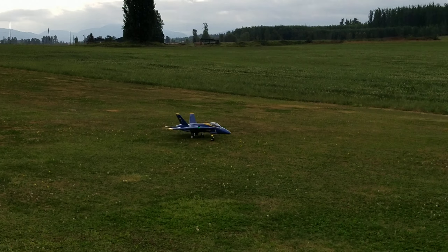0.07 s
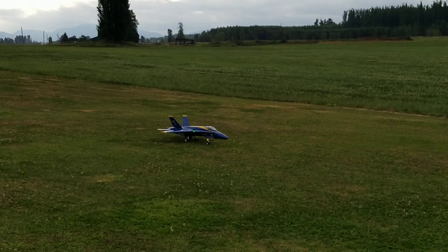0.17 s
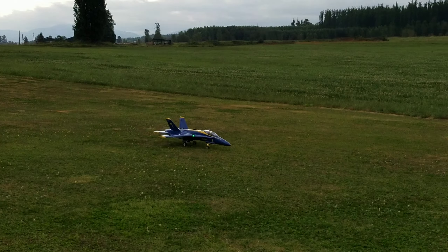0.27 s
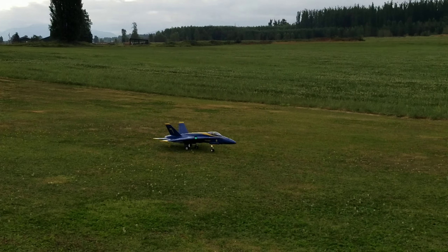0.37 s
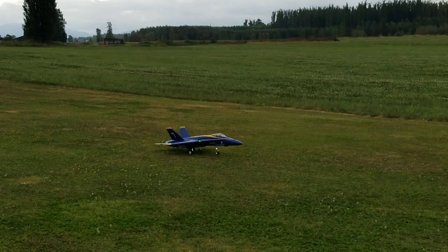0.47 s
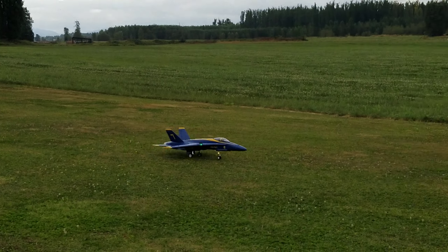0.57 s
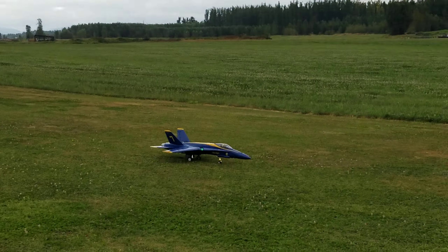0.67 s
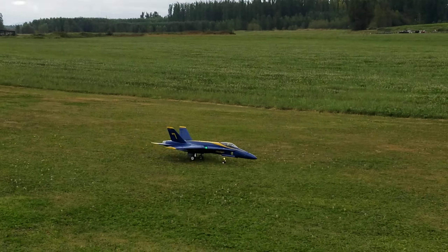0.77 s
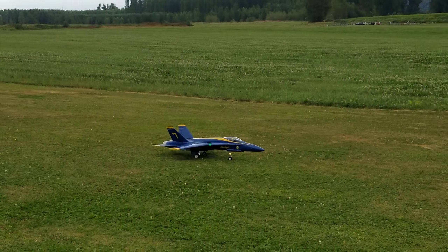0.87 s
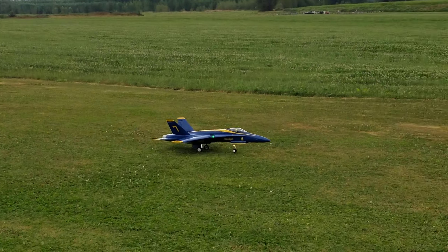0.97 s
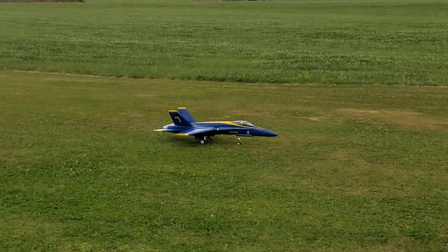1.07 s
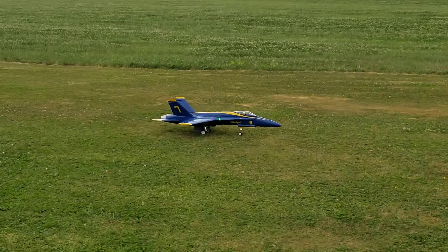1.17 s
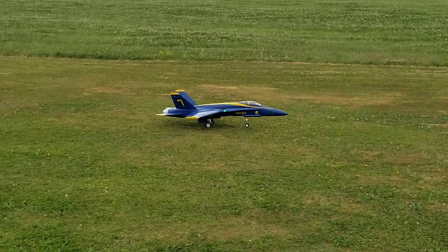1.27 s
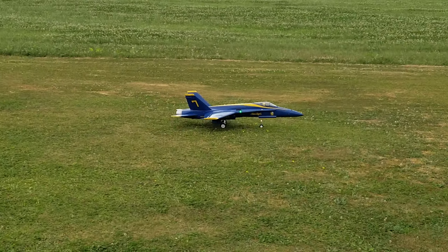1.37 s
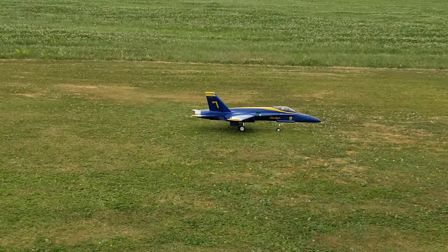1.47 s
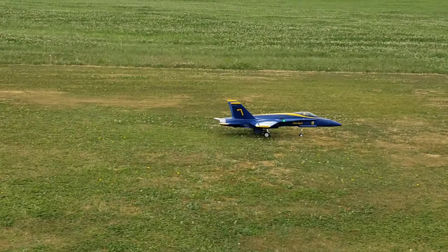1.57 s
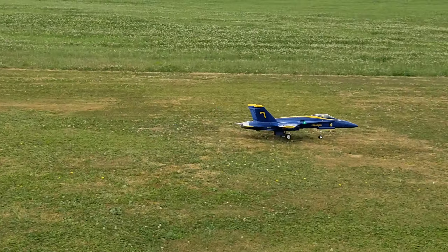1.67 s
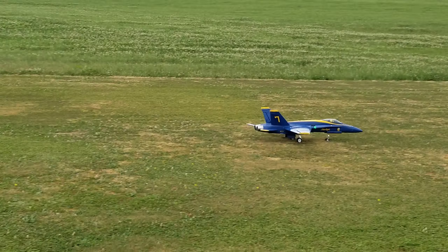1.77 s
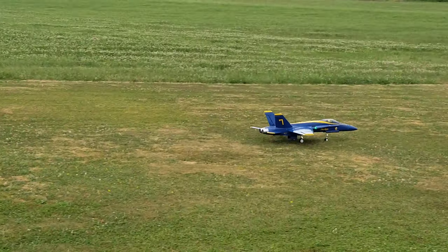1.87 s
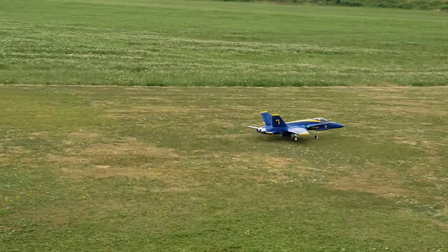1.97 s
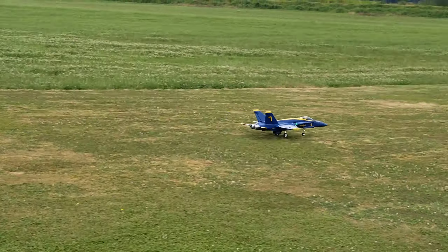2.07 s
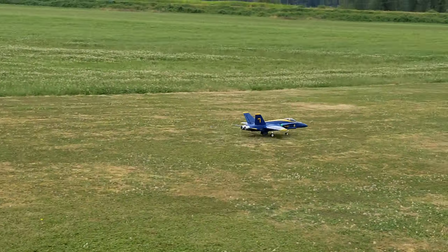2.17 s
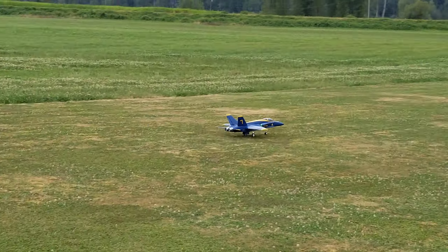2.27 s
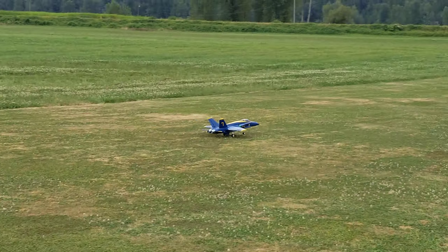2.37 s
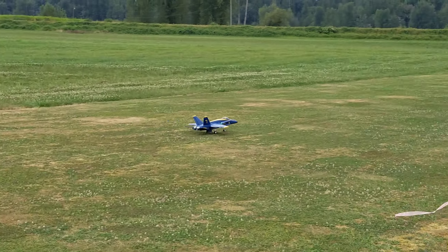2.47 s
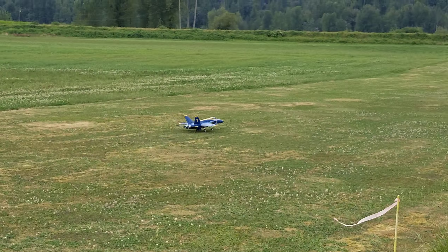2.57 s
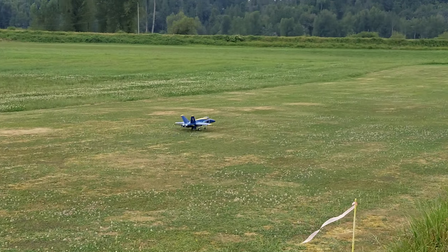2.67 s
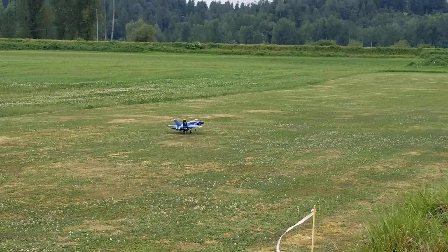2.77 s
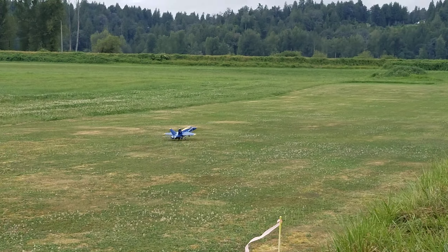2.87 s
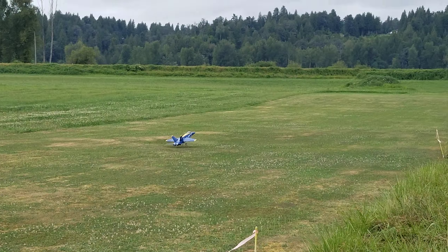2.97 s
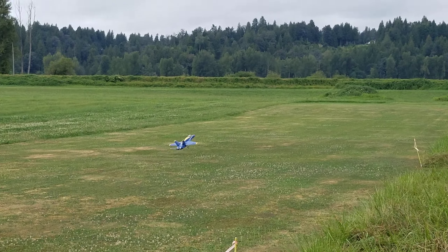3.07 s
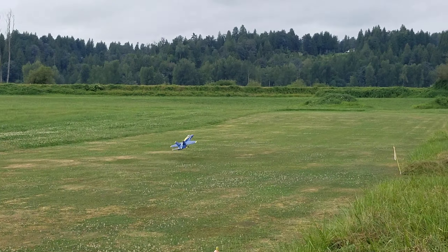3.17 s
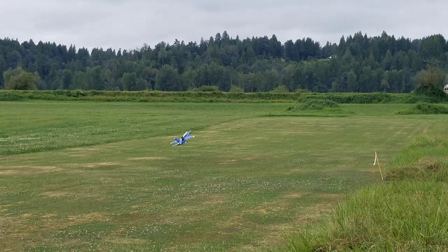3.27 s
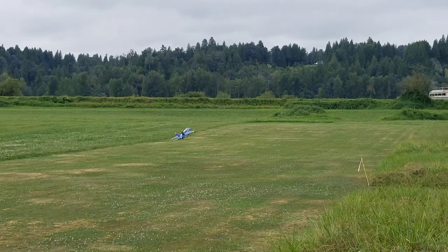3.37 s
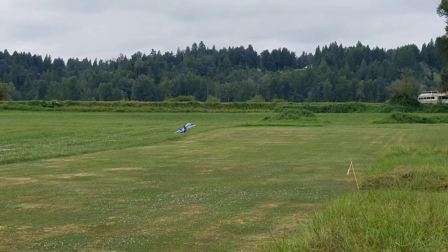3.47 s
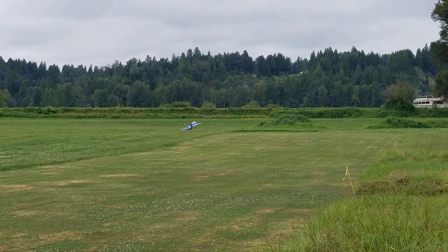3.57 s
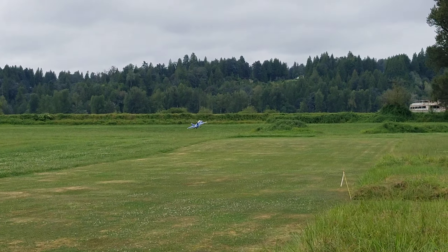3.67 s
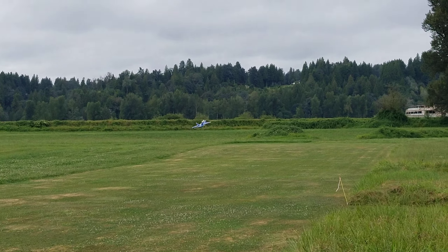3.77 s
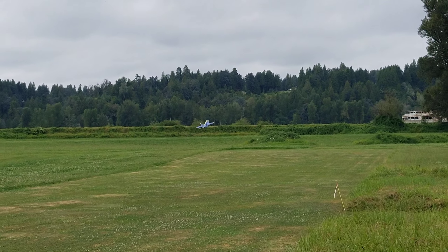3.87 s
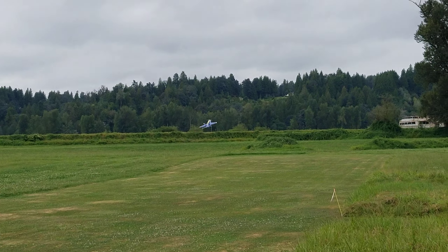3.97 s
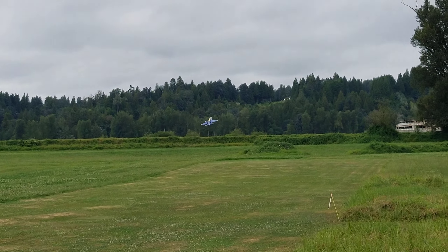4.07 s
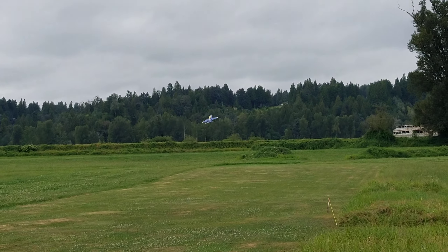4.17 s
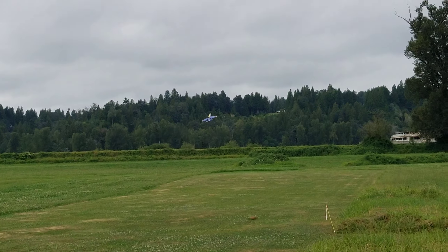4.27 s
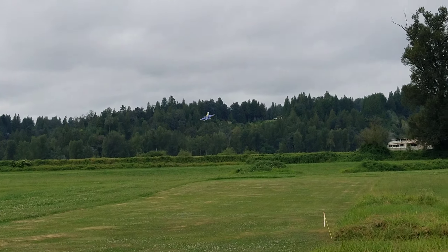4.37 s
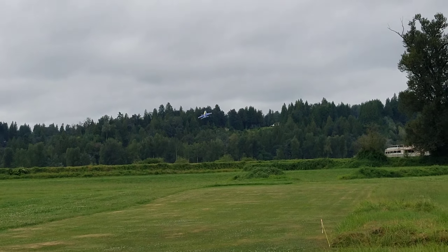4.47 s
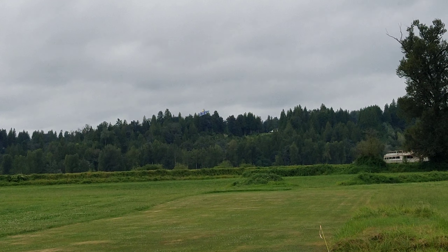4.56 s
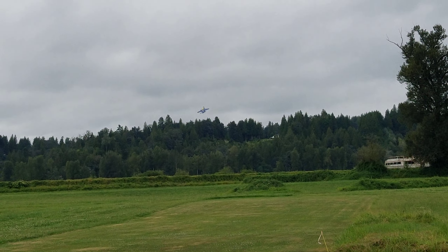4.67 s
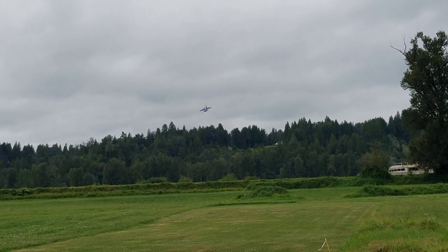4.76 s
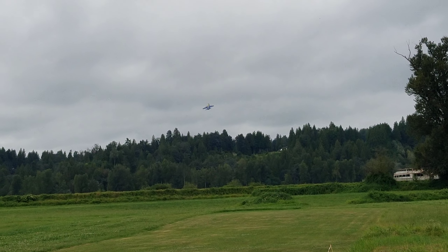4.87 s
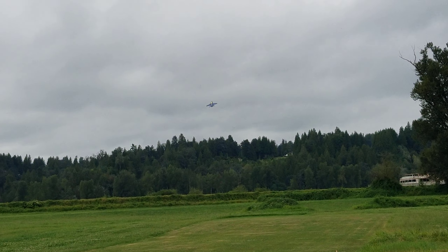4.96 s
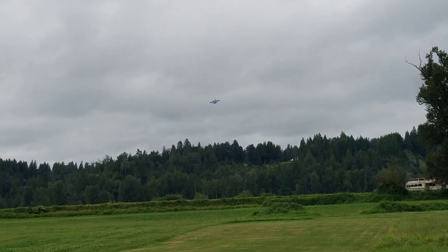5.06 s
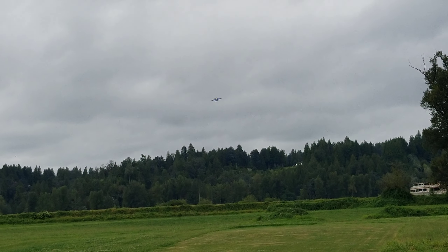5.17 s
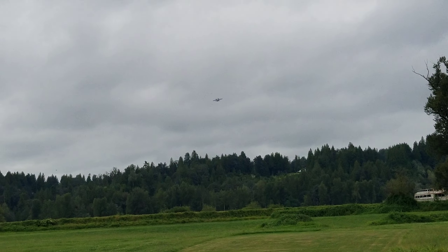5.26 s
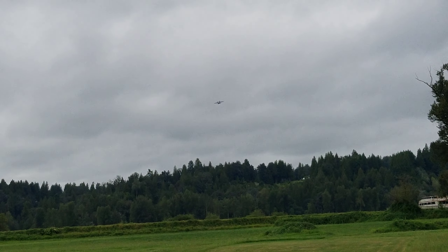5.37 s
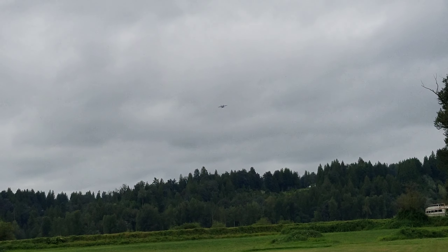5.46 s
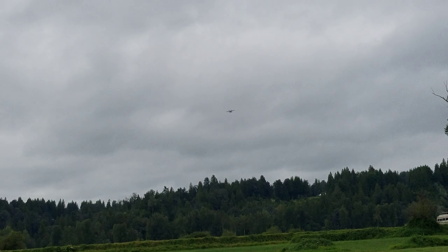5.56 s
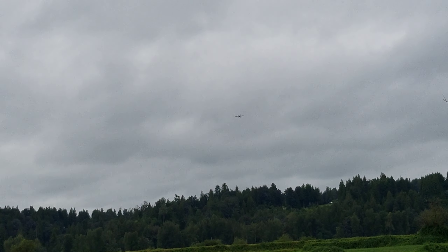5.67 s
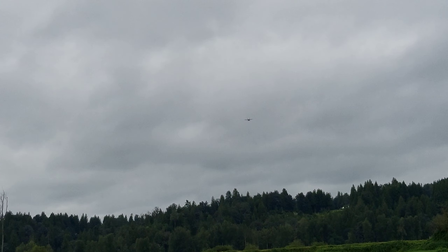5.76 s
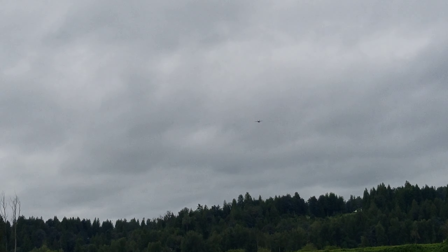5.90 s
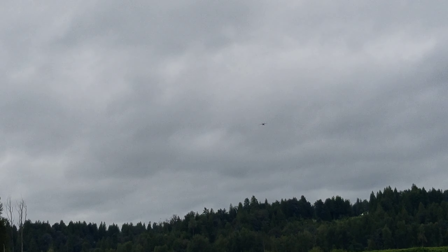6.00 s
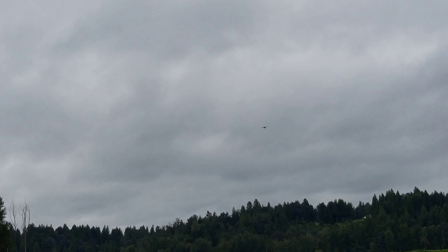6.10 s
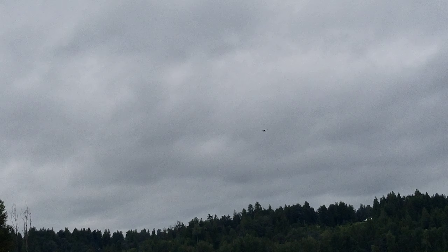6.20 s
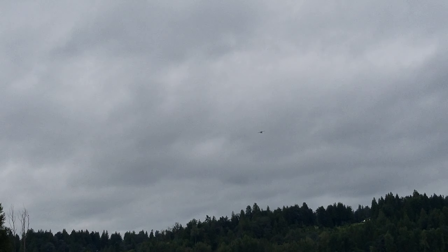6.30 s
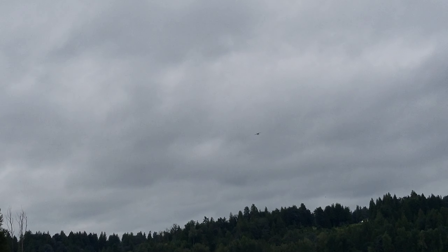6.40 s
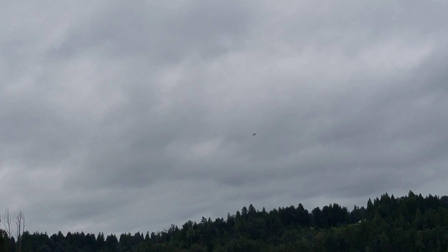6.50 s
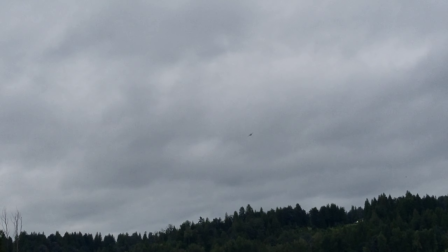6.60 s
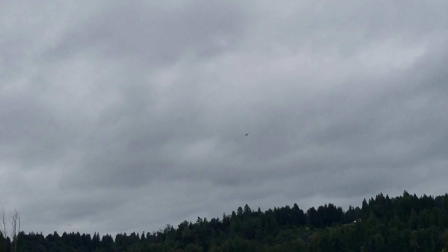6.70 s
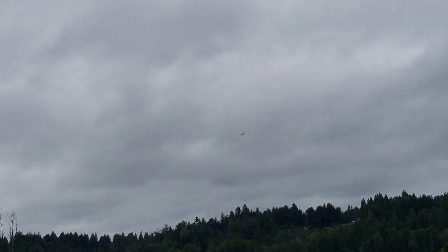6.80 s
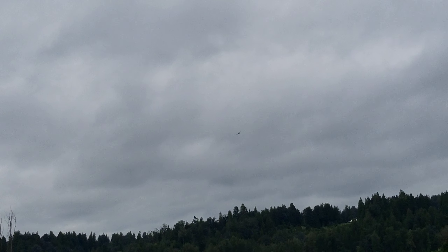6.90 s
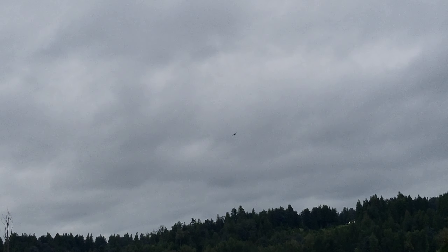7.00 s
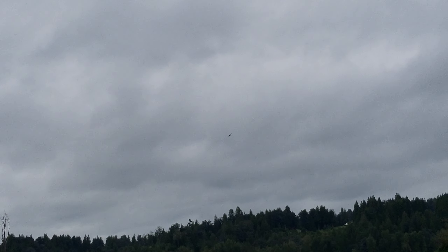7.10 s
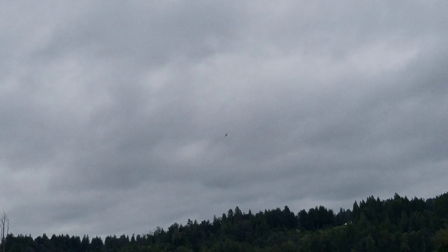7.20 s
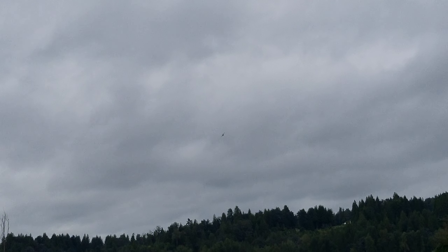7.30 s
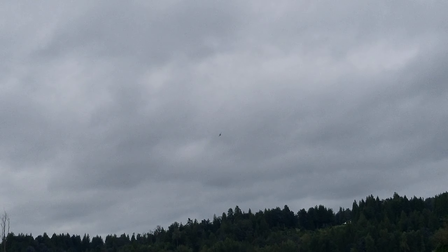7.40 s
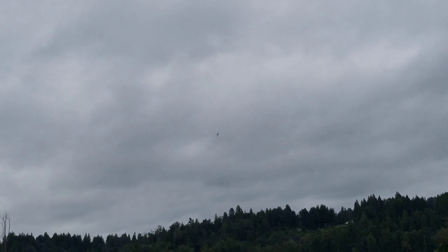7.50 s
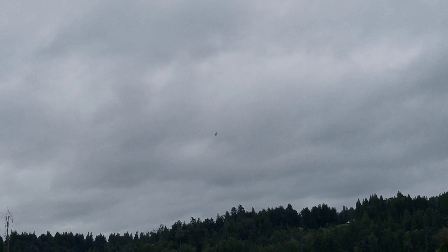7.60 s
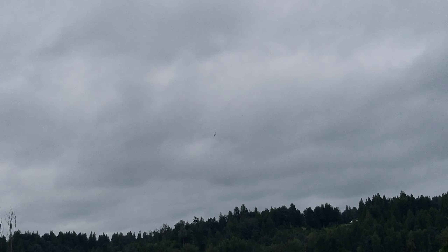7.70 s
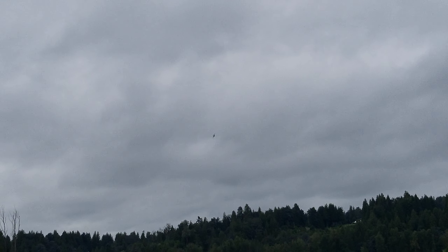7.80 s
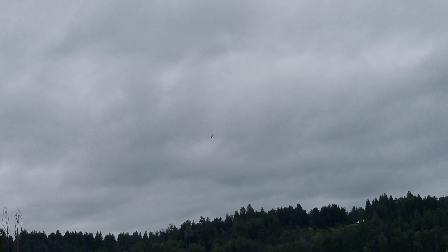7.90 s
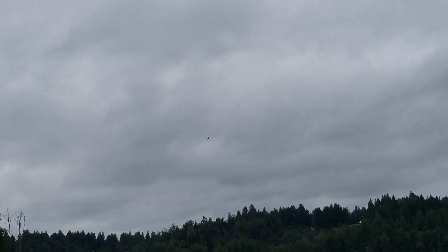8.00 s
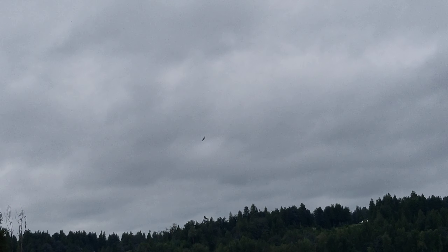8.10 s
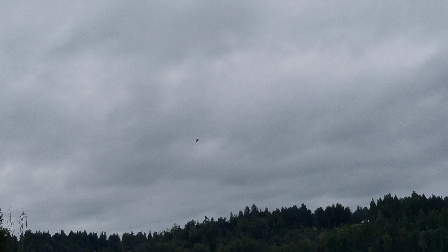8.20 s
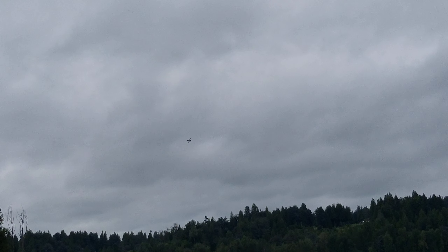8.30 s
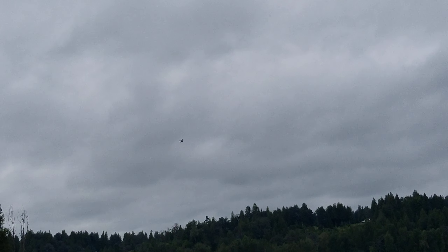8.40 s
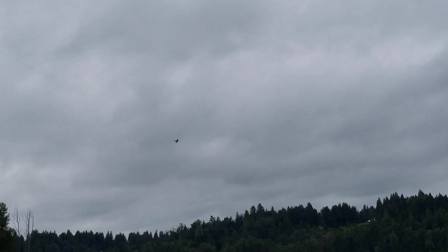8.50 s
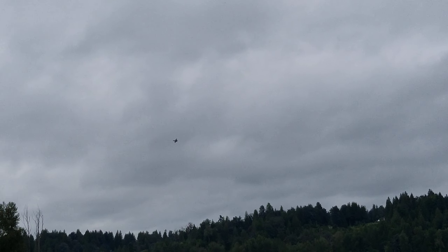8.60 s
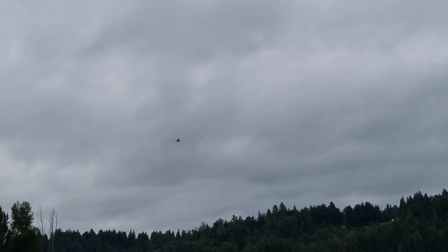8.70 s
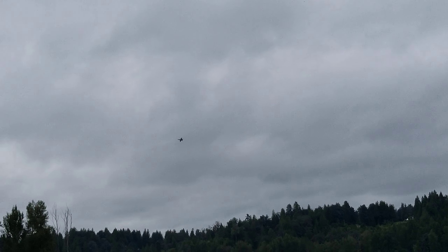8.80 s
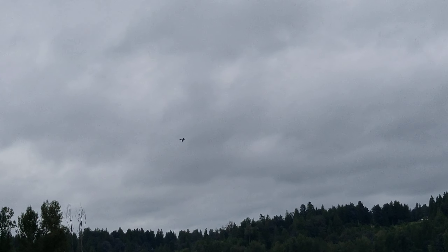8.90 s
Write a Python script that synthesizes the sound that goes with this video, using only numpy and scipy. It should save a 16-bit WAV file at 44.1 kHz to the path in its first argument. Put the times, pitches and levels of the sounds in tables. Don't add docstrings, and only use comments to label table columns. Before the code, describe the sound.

Outdoors on an open grass field, a model jet's electric fan whistles steadily, then jumps higher within the first second as it spools up. It passes close at about 1.3 seconds with a shrill whine, hollow duct hoots, broad hiss and low body drumming on turf. The pitch sags as it lifts off and recedes into a wavering, duller rush. Wind thumps the handheld stereo microphones, and a tiny lens motor squeaks near six seconds.

```python
import sys
import numpy as np
from scipy import signal
from scipy.fft import rfft, irfft, next_fast_len
from scipy.io import wavfile
from scipy.ndimage import uniform_filter1d, map_coordinates

SR = 44100
rng = np.random.default_rng(int(sys.argv[2]) if len(sys.argv) > 2 else 0)


def rack_gain(trim_db):
    fader = np.asarray(trim_db, float)
    return 10 ** (fader / 20)


def waveform_to_disk(signal):
    frames = np.transpose(np.atleast_2d(signal))
    scaled = np.clip(frames, -1, 1) * 32767
    samples = np.round(scaled).astype(np.int16)
    wavfile.write(sys.argv[1], SR, samples)


N = 394650
TIME_S = np.arange(N) / SR
COARSE_STEP = 40
COARSE_S = np.arange(0, N + COARSE_STEP, COARSE_STEP) / SR
PADDED = next_fast_len(N + 4096)
BINS_HZ = np.maximum(np.arange(PADDED // 2 + 1) * SR / PADDED, 1)

# frequency in Hz, density in dB
# per Hz.
FIELD_COLOUR_DB = [(180, -43), (300, -14.5), (571, -2.5), (1120, -4.5), (1490, -0.5), (1730, -7.5),
                   (2040, -5.5), (3130, -14), (4960, -2), (7500, -19), (9500, -36), (12000, -36),
                   (15500, -33)]
# centre in seconds, buffet level in dB, half-length in seconds,
# flutter above buffet in dB, left minus right in dB.
GUSTS = [(0.09, -35.5, 0.064, -11.5, -8), (0.264, -27, 0.054, -16.5, 19), (0.565, -34.5, 0.29, -7.5, 3.5),
         (0.842, -32, 0.16, -7.5, -21), (1.116, -32, 0.14, -3.5, -13), (1.498, -39, 0.092, 4.5, -17),
         (1.609, -27.5, 0.045, 2, -18), (1.705, -30.5, 0.03, 6, -23), (1.738, -31.5, 0.1, 1.5, -18),
         (1.995, -42, 0.61, -13, -5), (2.036, -43.5, 0.018, 7.5, -15), (2.658, -49.5, 0.091, -5, 4),
         (3.024, -49, 0.079, -7, 5), (3.467, -53.5, 0.069, -8, 7), (6.39, -41, 0.048, -10.5, 19),
         (7.544, -31, 0.044, -13.5, 19), (8.31, -46.5, .1, -15.5, 14), (3.015, -41.5, 0.34, -26, 22),
         (3.66, -38.5, 0.084, -35, 25), (3.8, -45.5, 0.3, -21, 32), (4.21, -42.5, 0.083, -38, 23),
         (4.834, -40.5, 0.22, -30, -5), (5.06, -34, 0.081, -43, 25), (5.347, -41, 0.21, -32, 26),
         (6.195, -35.5, 0.46, -30, 9), (6.615, -37.5, 0.052, -11.5, 26), (6.823, -28.5, 0.1, -22, 0.5),
         (7.102, -31.5, 0.12, -28, 7), (7.299, -29.5, 0.036, -5.5, 29), (7.487, -34, 0.18, -31, 16),
         (7.837, -37.5, 0.17, -39, 41), (8.113, -41.5, 0.3, -18, 25), (8.83, -37.5, 0.14, -40, 23),
         (8.747, -39, 0.053, -18, -7), (7.544, -42, 0.044, -14, -10), (6.27, -36, 0.06, -11.5, 18),
         (8.047, -43.5, .05, -7, 22)]
# start in seconds, end in seconds, start pitch in Hz, end pitch in Hz,
# level in dB.
SQUEALS = [
    (6.125, 6.161, 11940, 14900, -70),
    (6.15, 6.185, 12900, 14400, -72),
    (6.19, 6.27, 12600, 15700, -55),
    (6.395, 6.419, 16200, 14200, -68),
    (6.477, 6.547, 17400, 11800, -54),
    (6.545, 6.565, 14000, 12400, -80),
]
# peak in seconds, level in dB, rise in seconds, fall in seconds.
ROLLING = [
    (1.36, -40, 0.78, 0.98),
    (.1, -47.5, 1, 1),
    (3.7, -64, 0.97, 6.5),
]
# time in seconds, pitch in Hz.
HOOT_HZ = [(0, 892), (1.3, 943.5), (1.9, 920), (2.9, 888), (8.95, 884)]
HIGH_HOOT_HZ = [(0, 2200), (.85, 2220), (1, 2656), (1.3, 2650), (1.5, 2735), (8.95, 2646)]
# peak in seconds, level in dB, rise in seconds, fall in seconds.
HOOT_SWELLS = [
    (0.8, -44, 0.1, 0.55),
    (1.38, -41.5, 0.59, 0.34),
    (2.106, -46, 0.057, 0.4),
    (3.22, -53, 0.61, 0.19),
    (.3, -61.5, 1, 0.94),
]
HIGH_HOOT_SWELLS = [
    (.85, -61.5, .15, .1),
    (1.1, -35, 0.17, 0.087),
    (1.45, -36, 0.38, .45),
]

# time in seconds, loudness in dB,
# dulling by air and heading in dB at 10 kHz.
ROAR_FLIGHT = [(0, -2.5, 6.5), (.62, -7, 2.5), (.85, -0.5, 1.5), (1.5, 3.5, 10.5), (2, 0.5, 5.5),
               (2.4, -6.5, 0), (2.75, -9.5, 2), (3, -7.5, 8.5), (3.5, -5.5, 17), (4.3, -7, 14.5),
               (5, -8.5, 17), (5.5, -11, 14.5), (6, -2.5, 34), (6.5, -2.5, 38), (7.4, -17.5, 34),
               (8.1, -17.5, 38), (8.5, -6.5, 47.5), (8.95, -29, 16.5)]
# frequency in Hz, density in dB per Hz.
ROAR_COLOUR_DB = [(250, -14), (450, -19.5), (700, 0), (820, -10), (1100, -2.5), (1700, -2), (2200, -3.5),
                  (2450, -1), (2700, -2), (3000, -0.5), (4000, 2), (5200, 8), (6500, 5.5), (9000, 5),
                  (11000, 6), (16000, 3)]
# frequency in Hz, density in dB per Hz.
ROAR_ABEAM_DB = [(1000, -22.5), (2600, -20.5), (8000, -24.5), (13500, -29.5)]
# frequency in Hz, share 0-1.
ROAR_LIKENESS = [(250, 0.6), (550, 1), (1650, 1), (5000, 0.87), (7500, 0.64), (9000, 0.94), (15000, 0.49)]
# peak in seconds, gain in dB, rise in seconds,
# fall in seconds, centre in Hz.
BEAMS = [(0.26, 5, 0.14, 0.046, 2060), (0.37, -6.5, 0.56, 0.58, 14400), (.8, 5, 0.44, 0.02, 2970),
         (1.82, 8, 0.85, 0.41, 13200), (2.4, 4.5, 0.048, 0.038, 11000), (2.46, 6.5, 0.14, 0.95, 7700),
         (3.5, 6.5, 0.61, 0.68, 11500), (3.68, -7, 0.1, 0.25, 7100), (4.33, 4, 0.24, 0.2, 6000),
         (3.35, 4.5, 0.232, 0.33, 1200), (4.7, -1.5, 0.14, 0.23, 14700), (5.68, -6, 0.37, 0.71, 3100),
         (6.4, 8, 0.13, 0.082, 4020), (7.3, 14.5, 0.34, 0.21, 8000), (7.85, 16.5, 0.17, 0.16, 7900),
         (8.52, 8, 0.38, 0.21, 2300), (8.63, 17, 0.038, 0.15, 10400), (8.65, -16, .1, .3, 21000),
         (4.6, 0, .3, .4, 21000), (2.787, 6.5, 0.12, 0.089, 3800), (0.39, 6, .5, 0.27, 19000),
         (8.72, 4, .06, 0.11, 9500), (3.44, 5.5, 0.41, 0.25, 2850), (1.9, -2.5, 0.22, 0.35, 1600),
         (.1, -7.5, .3, 0.4, 640), (8.62, 15.5, 0.11, 0.41, 4750)]
# time in seconds, extra loss in dB above TOP_HZ.
TOP_LOSS_DB = [(0, 0), (4.9, 0), (5.4, 5), (6.5, 6), (8.4, 14), (8.95, 16)]
TOP_HZ = 11500
# time in seconds, extra path in ms, reflection 0-1.
GROUND_ECHO = [(0, .84, .45), (.65, .85, .45), (.9, .63, .2), (1.9, .61, .2), (2.1, .78, .15),
               (2.6, .78, 0), (2.7, .05, 0), (3.0, .1, .4), (3.3, .25, .55), (3.45, .42, .65),
               (3.6, .56, .85), (3.8, .68, .7), (4.05, .82, .75), (4.3, .96, .45), (4.55, 1.15, .5),
               (4.8, 1.4, .4), (5.1, 1.74, .6), (5.35, 1.95, .5), (5.7, 1.85, .3), (8.95, 1.83, .25)]
# time in seconds, delay in ms, share 0-1.
CHEST_ECHO = [(0, 2, 0), (3.2, 1.92, 0), (3.6, 1.92, .15), (4.3, 1.95, .25), (4.75, 2, .12), (5, 2, 0),
              (8.95, 2, 0)]

# time in seconds, blade-pass rate in Hz.
BLADE_PASS_HZ = [(0, 3884), (.605, 3896), (.68, 4075), (.78, 4510), (.92, 5062), (.99, 5330), (1.03, 5428),
                 (1.05, 5436), (1.2, 5414), (1.44, 5374), (1.7, 5306), (1.99, 5236), (2.2, 5188),
                 (2.4, 5148), (2.6, 5122), (3, 5066), (3.2, 5050), (3.36, 5033), (3.92, 4984), (5.04, 4941),
                 (7.28, 4843), (8.45, 4808), (8.605, 4817), (8.685, 4716), (8.775, 4712), (8.835, 4556),
                 (8.95, 4544)]
# time in seconds, level in dB.
WHISTLE_DB = [(0, -32), (.77, -30.5), (.9, -23), (1.05, -20.5), (1.27, -15.5), (1.74, -18), (2.1, -20.5),
              (2.72, -19), (3.16, -22), (3.55, -23.5), (3.8, -43), (4.5, -49), (5, -44.5), (5.45, -38.5),
              (6.1, -42), (6.7, -54), (7.25, -49), (8.25, -58.5), (8.6, -38.5), (8.95, -50)]
# centre in seconds, depth in dB (negative lifts), half-width in seconds.
WHISTLE_FADES = [(.01, -1.5, 0.13), (.1, 12, 0.13), (.155, 20, 0.029), (.42, 11, 0.1), (.58, 6.5, 0.043),
                 (.675, 15, 0.075), (.73, -1.5, 0.059), (.822, 17.5, 0.051), (1.1, 1.5, 0.043),
                 (1.22, 13, 0.036), (1.321, 15.5, 0.032), (1.39, 21, 0.043), (1.47, 14, 0.038),
                 (1.56, 11, 0.12), (1.7, 9, 0.026), (1.82, 7, 0.064), (1.94, 6.5, 0.074), (2.06, 9.5, 0.08),
                 (2.24, 3.5, 0.037), (2.49, 5.5, 0.17), (3.018, 13.5, 0.17), (3.29, 17, 0.13),
                 (3.459, 16, 0.14), (3.66, 17, 0.12), (6.25, 2, 0.21), (8.47, 7, .05), (8.69, 5, 0.039),
                 (8.82, 7, 0.04),
                 (.922, 12, .015), (.955, 7, .03), (1.0, 24, .04), (1.045, 7, .01), (1.087, 7, .012),
               (1.108, 6, .01)]
# peak in seconds, level in dB, rise in seconds,
# fall in seconds.
SECOND_LOBES = [(.21, -32.5, 0.061, 0.062), (.4, -35.5, 0.09, 0.06), (.5, -37, 0.046, .06),
                (.05, -39, .2, 0.11), (.75, -43, 0.23, 0.31), (.94, -37, 0.07, 0.087),
                (1.06, -28.5, 0.047, 0.043), (1.15, -31, .05, 0.058), (1.26, -28, 0.061, .08),
                (1.42, -29.5, 0.062, .1), (1.56, -32.5, 0.04, 0.11), (1.68, -37, .06, .06),
                (1.82, -38, 0.12, 0.047), (2.08, -30.5, 0.091, 0.26), (2.39, -30, 0.1, 0.11),
                (2.62, -35.5, 0.13, 0.13), (3, -43, 0.28, 0.27), (6, -71, .8, 0.73), (4, -49.5, 0.18, 0.78),
                (4.6, -67, 0.83, 0.67), (8.7, -67, 0.1, .15), (7.6, -79, .8, .6)]
THIRD_LOBES = [(1.98, -35, .06, .07), (2.09, -45, .05, .05), (2.21, -41, .025, .03), (2.28, -42, .04, .07),
               (2.76, -50, .05, .04), (3.3, -67, .5, .5)]
# peak in seconds, level in dB, rise in seconds, fall in seconds.
SHAFT_SWELLS = [
    (1.07, -38, 0.15, 0.22),
    (1.36, -36, 0.15, 0.41),
    (0.86, -56, 0.68, 0.9),
]
BLADES = 9

# frequency in Hz, left minus right in dB.
PORT_BALANCE_DB = [(300, -1), (450, -3), (700, -0.5), (2400, -0.5), (3200, 0), (4400, -2), (5600, 7.5),
                   (6400, 4), (7400, 4), (8600, -3.5), (9500, 6), (10300, -2.5), (11500, -6), (12700, -5),
                   (13800, 5), (14500, -3), (15500, -12)]
# frequency in Hz, left port lag in radians.
PORT_TURN_RAD = [(6000, 0), (7500, .5), (9500, .4), (11000, .1), (13300, 0), (14500, 1.1), (16000, 1.1)]
# time in seconds, lag in ms.
LEFT_LAG_MS = [(0, -.029), (.7, -.027), (1.05, -.02), (1.25, -.036), (1.45, -.02), (1.65, .006),
               (1.8, .016), (1.95, .018), (2.25, .005), (2.4, -.014), (2.6, -.024), (2.85, -.029),
               (3.4, -.021), (3.8, -.002), (4.2, .012), (4.6, .018), (5.15, .022), (5.75, .036),
               (6.1, .048), (6.8, .042), (7.5, .024), (8, .018), (8.95, .023)]
# left delay in ms, left gain, right delay in ms, right gain.
NEAR_ECHOES = [(.058, .72, .03, 0), (.35, .02, .34, -.08), (.78, -.09, .78, -.07), (.98, .17, .98, .15),
               (1.16, -.06, 1.16, -.07), (1.97, .18, 1.97, .1), (2.28, .05, 2.28, .08),
               (3.1, .04, 3.14, .04)]


def rms_one(x):
    return x / np.sqrt(np.mean(x ** 2) + 1e-20)


def in_time(rows, time_s=TIME_S):
    s, *columns = np.transpose(rows)
    return [np.interp(time_s, s, column) for column in columns]


def at_hz(points, hz):
    points_hz, values = np.transpose(points)
    return np.interp(np.log(hz), np.log(points_hz), values)


def fine(slow):
    return np.interp(TIME_S, COARSE_S, slow)


def drift(rate_hz):
    settle = 2000
    r = np.exp(-2 * np.pi * COARSE_STEP * rate_hz / SR)
    noise = rng.standard_normal(len(COARSE_S) + settle)
    return rms_one(signal.lfilter([1], [1, -2 * r, r * r], noise)[settle:])


def bell(peak_s, rise_s, fall_s):
    return ((COARSE_S - peak_s) / np.where(COARSE_S < peak_s, rise_s, fall_s)) ** 2


def swells(rows):
    power = sum(rack_gain(2 * db) * np.exp(-2 * bell(s, rise_s, fall_s)) for s, db, rise_s, fall_s in rows)
    return fine(10 * np.log10(power + 1e-12))


def band(x, low_hz, high_hz):
    return signal.sosfilt(signal.butter(2, [low_hz, high_hz], "band", fs=SR, output="sos"), x)


def evened(x, size):
    return rms_one(x / (uniform_filter1d(x ** 2, size=size) + 1e-9) ** 0.77)


def delayed(x, ms, order=1):
    return map_coordinates(x, [np.arange(N) - ms * SR / 1000], order=order, mode="nearest")


def stereo_white(likeness):
    mid, side = rfft(rng.standard_normal((2, PADDED)))
    alike = np.clip(likeness, 0, 1)
    return np.sqrt((1 + alike) / 2) * mid + np.sqrt((1 - alike) / 2) * side * [[1], [-1]]


def scatter(rate_hz):
    return drift(rate_hz) + 1j * drift(rate_hz)


def tone(phase, db, twinkle, rate_hz):
    common = 1 + twinkle * scatter(rate_hz)
    phasors = [fine(common + 0.13 * twinkle * scatter(rate_hz)) for _ in "LR"]
    wave = np.real(phasors * np.exp(1j * phase))
    return np.sqrt(2) * rack_gain(db) * wave / np.sqrt(1 + 2 * twinkle ** 2)


def field():
    white = stereo_white(0.29) * rack_gain(at_hz(FIELD_COLOUR_DB, BINS_HZ))
    return rack_gain(-52.5) * rms_one(irfft(white, PADDED)[:, :N])


def far_hum():
    hum_hz, start_db, fade_db_per_s = 565.3, -65.5, .3
    return tone(2 * np.pi * hum_hz * TIME_S, start_db - fade_db_per_s * TIME_S, twinkle=1.2, rate_hz=6.7)


def wind():
    breeze_db, breeze_flutter_db = -46, -63.5
    s, db, length_s, above_db, pan_db = np.transpose(GUSTS)
    capsules = []
    for side in (.5, -.5):
        lumps = fine(np.clip(drift(27.0), -2.5, 1.3))
        buffet = evened(band(rng.standard_normal(N), 48.9, 91.9), size=4000)
        flutter = evened(band(band(rng.standard_normal(N), 67.5, 178.5), 100, 350), size=3000)
        lean_db = db + 8.5 + side * pan_db - 10 * np.log10(rack_gain(pan_db) + rack_gain(-pan_db))
        buffet_rows = [*zip(s, lean_db, length_s, length_s), (0, breeze_db, np.inf, np.inf)]
        flutter_rows = [*zip(s, lean_db + above_db, length_s, length_s),
                        (0, breeze_flutter_db, np.inf, np.inf)]
        buffet_gain = rack_gain(swells(buffet_rows) + 2.0 * lumps)
        flutter_gain = rack_gain(swells(flutter_rows) + 5.15 * lumps)
        capsules.append(buffet_gain * buffet + flutter_gain * flutter)
    return np.array(capsules)


def lens_motor():
    on_s, off_s, ramp_s = 6.12, 6.58, 0.11
    hiss = rms_one(band(band(rng.standard_normal(N), 12000, 16500), 13000, 19000))
    running = np.clip(np.minimum(TIME_S - on_s, off_s - TIME_S) / ramp_s, 0, 1)
    hiss_db = np.interp(TIME_S, (on_s, off_s), (-61.5, -56)) + 2.0 * fine(drift(56))
    out = running * rack_gain(hiss_db) * hiss
    for start_s, end_s, from_hz, to_hz, db in SQUEALS:
        length_s = end_s - start_s
        along = np.arange(0, 1, 1 / SR / length_s)
        phase = 2 * np.pi * length_s * (from_hz * along + (to_hz - from_hz) * along ** 2 / 2)
        at = round(start_s * SR)
        out[at:at + len(along)] += rack_gain(db) * np.sin(np.pi * along) ** .5 * np.sin(phase)
    return out * rack_gain(np.array([[-36], [5]]))


def rolling():
    mid, side = band(band(rng.standard_normal((2, N)), 262, 610), 465, 1100)
    drum = rms_one(mid + 0.088 * side * [[1], [-1]])
    return rack_gain(swells(ROLLING) + 1.5 * fine(drift(4.3))) * drum


def hoot(hz, db, rate_hz):
    return tone(2 * np.pi * np.cumsum(hz) / SR, db, twinkle=3.8, rate_hz=rate_hz)


def duct_hoots():
    low = hoot(*in_time(HOOT_HZ), swells(HOOT_SWELLS), rate_hz=31)
    high = hoot(*in_time(HIGH_HOOT_HZ), swells(HIGH_HOOT_SWELLS), rate_hz=54)
    return low + high


def roar(patchy_db=1.15, gust_db=0.5):
    dulling_power, beam_octaves = 0.54, 0.59
    white = stereo_white(at_hz(ROAR_LIKENESS, BINS_HZ)) * rack_gain(at_hz(ROAR_COLOUR_DB, BINS_HZ))
    loud_db, dull_db = in_time(ROAR_FLIGHT, COARSE_S)
    top_loss_db, = in_time(TOP_LOSS_DB, COARSE_S)
    centres_hz = [250, 420, 680, 1050, 1550, 2200, 3000, 4100, 5500, 7300, 9300, 11300, 11800, 15000]
    together, out = drift(6.5), 0
    for k, hz in enumerate(centres_hz):
        share = np.interp(BINS_HZ, centres_hz, np.arange(len(centres_hz)) == k)
        db = at_hz(ROAR_ABEAM_DB, hz) + loud_db
        db = db - dull_db * (hz / 10000) ** dulling_power - top_loss_db * (hz > TOP_HZ)
        for s, gain_db, rise_s, fall_s, beam_hz in BEAMS:
            off_beam = (np.log2(hz / beam_hz) / beam_octaves) ** 2
            db = db + gain_db * np.exp(-bell(s, rise_s, fall_s) - off_beam)
        gain = fine(rack_gain(db + gust_db * together + patchy_db * drift(9.5)))
        out = out + gain * irfft(white * share, PADDED)[:, :N]
    return out


def over_grass(x):
    turn_rad, dull_hz = 2.35, 7500
    ms, reflection = in_time(GROUND_ECHO)
    grass = np.exp(-1j * turn_rad) / (1 + (BINS_HZ / dull_hz) ** 2)
    dull = irfft(rfft(x, PADDED) * grass, PADDED)[:, :N]
    share = np.clip(reflection * (.95 + .1 * fine(drift(4))), 0, .95)
    ms = ms * (1 + .008 * fine(drift(6)))
    return x + share * np.array([delayed(port, ms) for port in dull])


def off_chest(x):
    ms, share = in_time(CHEST_ECHO)
    dull = signal.sosfilt(signal.butter(1, 6000, fs=SR, output="sos"), x)
    filter_lag_ms = .025
    return x + share * np.array([delayed(port, ms - filter_lag_ms) for port in dull])


def fan():
    hz, = in_time(BLADE_PASS_HZ)
    phase = 2 * np.pi * np.cumsum(hz) / SR
    fade_db = 0
    for s, depth_db, width_s in WHISTLE_FADES:
        fade_db = fade_db + depth_db * np.maximum(1 - abs(COARSE_S - s) / width_s, 0)
    whistle_db = in_time(WHISTLE_DB)[0] - fine(fade_db)
    lines = tone(phase, whistle_db, twinkle=0.12, rate_hz=36)
    lines += tone(2 * phase, swells(SECOND_LOBES), twinkle=0.2, rate_hz=36)
    lines += tone(3 * phase, swells(THIRD_LOBES) + 4.0, twinkle=.3, rate_hz=21)
    lines += tone(phase / BLADES, swells(SHAFT_SWELLS), twinkle=.15, rate_hz=8.6)
    mid, side = rms_one(band(rng.standard_normal((2, N)), 27, 290))
    wake = 0.58 * mid + 0.91 * side * [[1], [-1]]
    wake_db = uniform_filter1d(whistle_db, size=2600) - 14.0
    return lines + rack_gain(wake_db) * wake * np.cos(phase)


def through_ports(air):
    cloth_hz, body_ms = 4000, .5
    balance = rack_gain(at_hz(PORT_BALANCE_DB, BINS_HZ) * [[.5], [-.5]])
    response = balance * np.exp(1j * at_hz(PORT_TURN_RAD, BINS_HZ) * [[-.5], [.5]])
    for left_ms, left_gain, right_ms, right_gain in NEAR_ECHOES:
        late = np.exp(-2j * np.pi * BINS_HZ * [[left_ms], [right_ms]] / 1000)
        dull = 1 / (1 + (BINS_HZ / cloth_hz) ** 4 * (left_ms > body_ms))
        response *= 1 + dull * late * [[left_gain], [right_gain]]
    left, right = irfft(rfft(air, PADDED) * response, PADDED)[:, :N]
    return np.array([delayed(left, in_time(LEFT_LAG_MS)[0], order=3), right])


def scene():
    jet = fan() + duct_hoots() + rolling() + off_chest(over_grass(roar()))
    return through_ports(rack_gain(-1.0) * jet + field() + far_hum() + lens_motor()) + wind()


def band_limit(x):
    return signal.sosfilt(signal.butter(12, 15740, fs=SR, output="sos"), x)


def record(dry):
    mix = 0.82 * np.tanh(dry / 0.8)
    return band_limit(mix)


dry = scene()
out = record(dry)
waveform_to_disk(out)
```